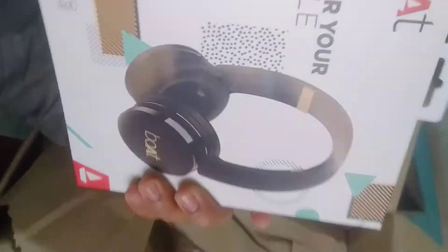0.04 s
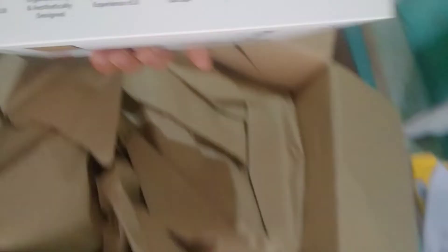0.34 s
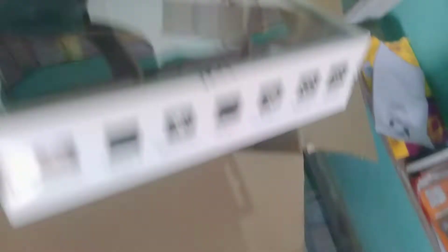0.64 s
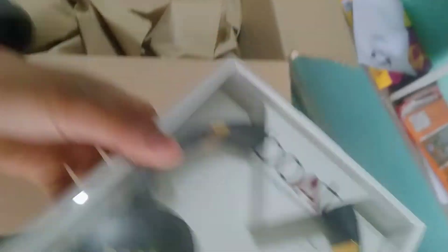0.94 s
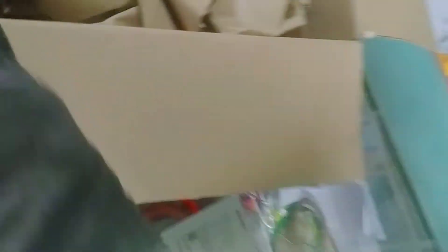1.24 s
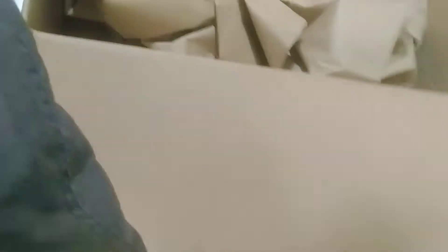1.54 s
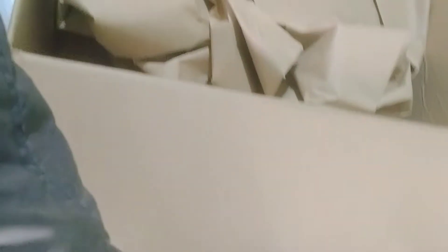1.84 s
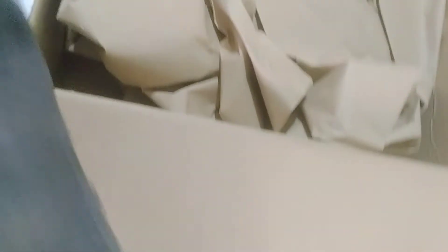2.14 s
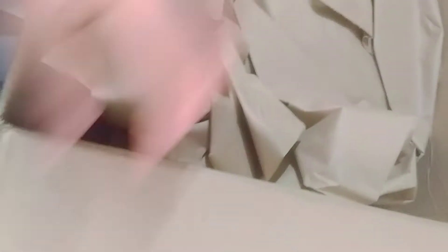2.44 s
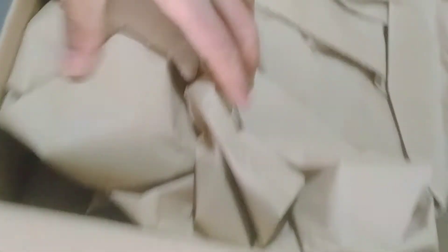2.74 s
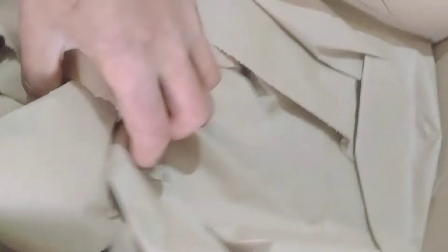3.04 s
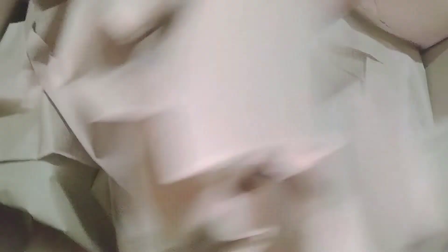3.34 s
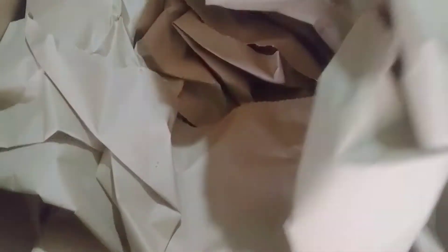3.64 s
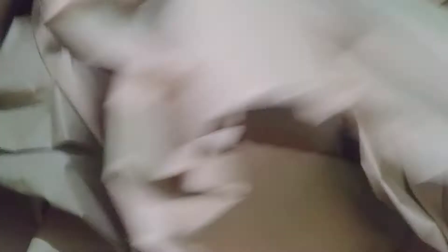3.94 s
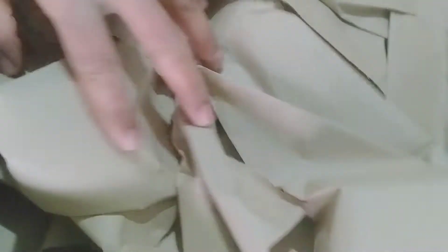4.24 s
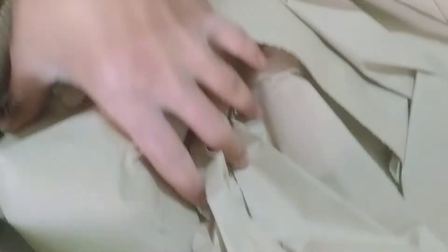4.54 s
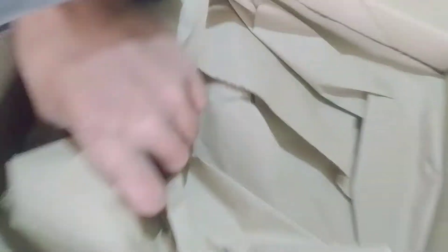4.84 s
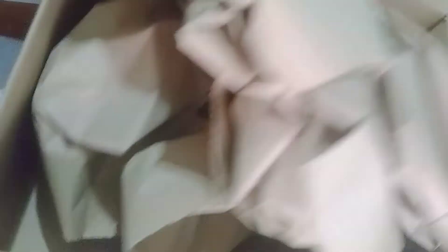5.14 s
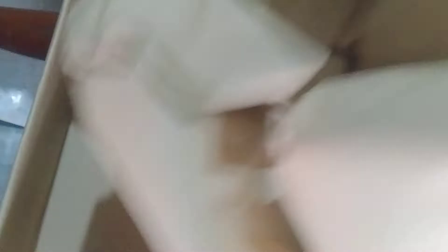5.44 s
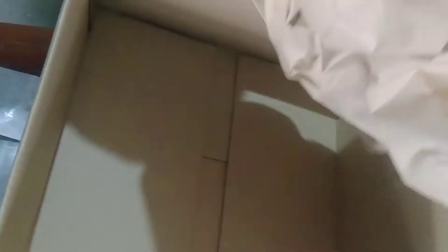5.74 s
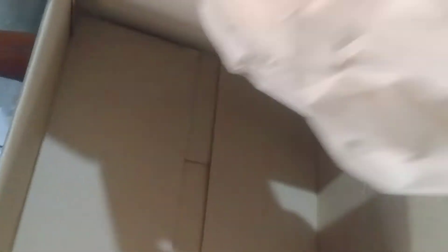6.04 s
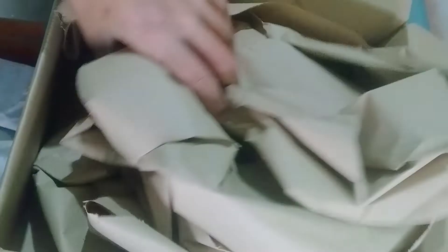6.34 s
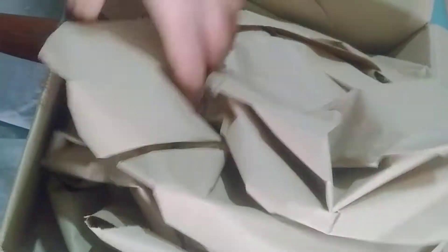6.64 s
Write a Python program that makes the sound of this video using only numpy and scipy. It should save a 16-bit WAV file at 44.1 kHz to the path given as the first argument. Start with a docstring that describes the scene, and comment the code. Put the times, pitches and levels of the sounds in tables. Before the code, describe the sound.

A small carton is set aside with faint taps, a short skid and the brush of a sleeve. Then a hand digs through crumpled packing paper in a cardboard box, much louder, with sliding hiss, crackles, sharp crease snaps and hollow bumps. The paper squeaks briefly as the wad is lifted and the box thuds. After a short lull the paper is stuffed back with another thump. A close microphone in a small, quiet room.

```python
"""A small, quiet room, heard through one close microphone. A small carton is lifted out and set aside
with taps, a skid and the brush of a sleeve. Then a hand digs through crumpled packing paper in a
cardboard box, lifts the wad out and stuffs it back. Sheets hiss as they slide and crackle as they
buckle, creases snap, and a fold squeaks as it sticks and slips. Bumps make the box walls ring,
and the box thuds as it rocks on the floor."""
import sys
import numpy as np
from scipy import signal
from scipy.fft import rfft, irfft
from scipy.io import wavfile
from scipy.ndimage import uniform_filter1d, map_coordinates

SR = 44100
rng = np.random.default_rng(int(sys.argv[2]) if len(sys.argv) > 2 else 0)


def inscribe(sig):
    """Save sig as 16-bit PCM at rate SR to the path in sys.argv[1].

    A 1-D sig is mono; a 2-D sig holds one channel per row.
    Samples are clipped to [-1, 1] before scaling.
    """
    pcm = np.round(np.clip(np.atleast_2d(sig).T, -1, 1) * 32767)
    wavfile.write(sys.argv[1], SR, pcm.astype(np.int16))


N = 294588
TIME = np.arange(N) / SR

# How hard the hand works the paper: time_s, sliding_db, crumpling_db
DIG_IN = [(2.527, -52.5, -49), (2.575, -52.5, -53.5), (2.61, -41.5, -42.5), (2.63, -52, -44.5),
          (2.665, -43.5, -47), (2.69, -41, -43.5), (2.725, -46, -46), (2.755, -48.5, -49),
          (2.795, -40.5, -39.5), (2.83, -39.5, -49), (2.853, -45, -49), (2.875, -39.5, -47),
          (2.915, -42, -46.5), (2.96, -40, -39), (3.0, -42, -39.5), (3.04, -39, -37), (3.18, -34.5, -34),
          (3.24, -37.5, -39.5), (3.31, -35.5, -37), (3.37, -40.5, -39.5), (3.54, -41, -40.5),
          (3.615, -45.5, -43.5), (3.66, -44.5, -42), (3.70, -50.5, -46.5), (3.75, -50.5, -52),
          (3.775, -61, -61), (3.812, -52, -53)]
PULL_OUT = [(3.814, -46.5, -38.5), (3.849, -41.5, -45), (3.901, -39, -38), (3.93, -41.5, -42),
            (3.959, -35.5, -36), (4.06, -33.5, -36), (4.128, -33, -35.5), (4.175, -38.5, -39.5),
            (4.235, -35, -33.5), (4.268, -33.5, -33.5), (4.291, -41, -43.5), (4.33, -43.5, -45.5),
            (4.4, -37, -38), (4.46, -36, -38), (4.53, -43.5, -44.5), (4.6, -38, -40), (4.74, -43, -42),
            (4.829, -37, -35), (4.901, -38, -41), (5.02, -38, -44.5), (5.11, -32, -38.5),
            (5.18, -38.5, -42), (5.235, -41.5, -41), (5.28, -39, -48), (5.39, -41.5, -41.5),
            (5.47, -51.5, -46), (5.58, -55.5, -57.5), (5.9, -53.5, -60.5), (6.02, -67.5, -61)]
STUFF_BACK = [(6.021, -66.5, -63.5), (6.11, -48, -51.5), (6.16, -45.5, -50), (6.22, -34, -31),
              (6.312, -31, -36.5), (6.46, -43.5, -39.5), (6.509, -53.5, -47.5), (6.68, -48.5, -46.5)]
# Brief swells in the paper's sound: middle_s, length_s, level_db
FOLD_COLLAPSES = [(2.603, 0.022, -42.5), (2.826, 0.0086, -40), (2.915, 0.016, -42), (3.635, 0.029, -43),
                  (3.743, 0.022, -46), (3.941, 0.01, -35), (4.494, 0.013, -35.5), (5.232, 0.013, -44),
                  (6.2, 0.013, -38.5), (6.32, 0.048, -35.5)]   # a fold caves in with a cluster of crackles
SHEET_BILLOWS = [(2.62, 0.072, -48), (2.73, 0.033, -47), (2.955, 0.05, -46), (3.04, 0.02, -46),
                 (3.17, 0.019, -47), (3.31, 0.041, -47), (3.725, 0.039, -46), (4.39, 0.013, -32.5),
                 (4.51, 0.038, -38.5), (4.64, 0.17, -41.5), (4.83, 0.077, -40), (5.0, 0.13, -44),
                 (5.41, 0.1, -43), (5.47, 0.081, -42), (6.31, 0.15, -36), (6.62, 0.088, -44.5)]   # a push makes a whole sheet billow
AIR_SHOVES = [(1.9, 0.073, -69), (2.2, 0.42, -71), (4.06, 0.096, -58), (5.21, 0.04, -48.5),
              (5.47, 0.068, -40), (6.26, 0.13, -45.5), (6.36, 0.088, -54)]   # the box or the wad pushes air about
# The tone (how strong the lows and highs are) of each paper sound: frequency_hz, level_db
SLIDE_TONE = [(1800, -23), (2800, -4.5), (3400, -4), (4400, 0), (5100, 1), (5800, 0), (6500, -8),
              (7000, -22), (7500, -29.5)]
CRUMPLE_TONE = [(400, -23.5), (570, -11.5), (700, 3.5), (820, 6.5), (910, 0), (1090, 5), (1250, 2.5),
                (1470, 1.5), (1700, 3), (2350, 1.5), (2900, -8), (3500, -12.5), (4500, -28.5)]
CRUNCH_TONE = [(380, -18), (520, -5.5), (620, 0), (740, -2), (950, -10.5), (1400, -25.5)]   # broad patches of paper buckling
FLAP_TONE = [(90, -33.5), (180, -5.5), (255, 1), (305, 2.5), (345, 0), (390, -0.5), (490, -1), (570, -10),
             (800, -26.5)]
AIR_TONE = [(30, -40.5), (60, -20), (85, -12), (125, 6.5), (170, 1), (230, -10), (320, -27.5)]
POP_TONE = [(100, -15), (300, -2.5), (1000, -2), (2900, -6.5), (5000, -14)]   # the flat patch beside a snapping crease
CRACK_TONE = [(800, -12), (2000, -6.5), (3200, -1), (4600, 7.5), (5600, 2.5), (6300, 1), (7000, -14.5),
              (8000, -32)]   # the crease itself
RASP_TONE = [(2500, -1), (3800, -12), (5100, 1), (5900, -0.5), (6500, -12), (7200, -29.5)]   # the rough part of the squeak
# Big creases snapping: start_s, pop_db, crack_db, pitch_hz, length_s
BIG_SNAPS = [(2.537, -46, -43.5, 2200, 0.0045), (2.6877, -34, -39.5, 1980, 0.0062),
             (2.7262, -41, -42, 1700, 0.0021), (2.9275, -39, -40, 1690, 0.0017),
             (2.9383, -36, -35, 2000, 0.0015), (2.957, -28.5, -27.5, 900, 0.003),
             (3.0255, -32, -29, 1700, 0.0069), (3.0315, -35, -30, 2000, 0.0023),
             (3.0645, -36, -27.5, 2410, 0.0046), (3.1326, -21, -34, 1810, 0.0033),
             (3.134, -33.5, -22.5, 2450, 0.0033), (3.1432, -37, -18.5, 2930, 0.0028),
             (3.1434, -15.5, -25.5, 1900, 0.0012), (3.1415, -22, -33, 900, 0.0055),
             (3.171, -30.5, -25, 2530, 0.0041), (3.1807, -27, -34, 1510, 0.0062),
             (3.271, -35.5, -34, 2800, 0.0031), (3.3025, -33.5, -19, 2540, 0.0054),
             (3.334, -29, -29, 2600, 0.01), (3.3975, -29, -41, 1670, .006),
             (3.5495, -32, -36, 1670, 0.0046), (3.6475, -40, -37, 1930, 0.0036),
             (3.8173, -36.5, -35, 2060, 0.0055), (3.864, -30, -37, 1670, 0.006),
             (3.8935, -29, -38, 2000, .004), (3.9515, -30, -29, 2280, 0.0038),
             (3.966, -31, -33, 1900, 0.0024), (4.052, -32, -31, 1630, .003),
             (4.132, -31, -40, 1900, 0.0014), (4.381, -25.5, -24.5, 1900, 0.0051),
             (4.4385, -31, -38, 1980, 0.0031), (4.461, -38, -31, 2200, 0.0023),
             (4.5502, -41.5, -24.5, 2660, 0.0023), (4.709, -45, -40, 1510, 0.0027),
             (4.7255, -32.5, -35.5, 2600, 0.0023), (4.7692, -27, -29, 2500, 0.0076),
             (4.8255, -30, -31, 2000, 0.0059), (4.84, -28.5, -31, 2180, 0.0029),
             (4.9624, -30.5, -33, 2360, 0.0044), (5.0045, -38, -36, 2000, 0.0033),
             (5.368, -32, -29.5, 2200, 0.006), (5.4461, -30.5, -38, 1090, 0.0075),
             (5.4795, -36, -52, 1310, 0.0027), (6.2318, -21.5, -27.5, 2000, .007),
             (6.3085, -35, -27.5, 1490, 0.0016), (6.4215, -34, -38.5, 1900, 0.003),
             (6.454, -36, -33.5, 2200, 0.0016), (6.5125, -43.5, -44.5, 2000, 0.0043)]
# Kinks running along a fold: start_s, length_s, level_db, start_hz, end_hz
KINK_ZIPS = [(2.537, .004, -43, 700, 4400), (2.7258, .0042, -33, 1450, 4500),
             (2.9275, .0035, -32, 1100, 2800), (3.1708, .003, -24, 6400, 2000),
             (3.6458, .0056, -30, 950, 4600), (3.8168, .0062, -30.5, 6300, 1300),
             (4.4388, .0045, -31, 5600, 3500)]
# A fold squeaking under a finger: time_s, level_db, pitch_hz
FOLD_SQUEAK = [(5.046, -47, 2450), (5.0505, -21.5, 2480), (5.053, -34.5, 2312), (5.0585, -19.5, 2443),
               (5.062, -33, 2470), (5.069, -16, 2370), (5.073, -25.5, 2240), (5.082, -31, 2240)]
# A stiff paper edge slipping over the box rim: start_s, level_db
EDGE_SLIPS = [(5.3661, -31), (5.3682, -22.5), (5.3705, -26.5), (5.374, -33)]
# Cardboard and paper sliding: start_s, end_s, level_db, start_hz, end_hz, width_share (of start_hz)
HOLLOW_SWISHES = [(0.477, 0.633, -70.5, 5580, 4950, .06), (1.415, 1.716, -77, 754, 677, 0.044),
                  (1.853, 2.426, -70, 882, 1194, 0.035), (1.878, 1.933, -75, 4750, 4650, .05),
                  (2.761, 2.927, -52, 4720, 4440, .05), (3.195, 3.299, -37.5, 5180, 4960, .05),
                  (4.871, 5.076, -43, 5430, 6050, 0.045), (6.168, 6.488, -41, 5550, 5700, 0.064),
                  (5.718, 5.96, -66.5, 993, 865, 0.069), (5.954, 6.199, -70.5, 695, 712, .1),
                  (6.183, 6.472, -41, 941, 1101, 0.14), (6.477, 6.745, -47, 1100, 850, 0.27),
                  (6.481, 6.656, -53.5, 2590, 2814, 0.041)]
# Knocks, each favouring one pitch: start_s, level_db, contact_hz
BOX_BUMPS = [(2.688, -19.5, 380), (2.957, -28, 420), (3.043, -18.5, 380), (3.143, -17.5, 487),
             (3.287, -32, 330), (4.079, -24.5, 300), (4.385, -20.5, 330), (4.392, -20.5, 300),
             (4.585, -15, 317), (4.836, -30.5, 336), (5.371, -26, 700), (5.445, -17.5, 405),
             (5.454, -11, 268), (6.233, -13, 440), (6.279, -13, 332)]   # wad and knuckles hit the box
CARTON_TAPS = [(.6585, -50, 1020), (.682, -71, 800), (.836, -48, 250), (.848, -47.5, 1410),
               (.850, -36.5, 252), (.862, -47.5, 710), (.873, -52, 696), (.883, -47, 500), (.894, -57, 950),
               (.905, -53, 1050), (1.886, -40, 300), (1.895, -67, 600), (1.908, -50, 330),
               (2.145, -49, 450)]   # the carton is tapped and set down
# The whole box rocking on the floor: start_s, level_db
BOX_THUDS = [(5.4562, -16.5), (5.489, -29), (5.519, -29.5), (6.236, -21)]
# The carton juddering over a surface: time_s, level_db, slips_per_s
CARTON_SKID = [(1.07, -80, 235), (1.085, -57, 195), (1.113, -53.5, 190), (1.138, -59, 175),
               (1.16, -66, 120), (1.19, -80, 154)]
# The notes each thing rings with: pitch_hz, level_db, fade_s (time to fall by 60 dB)
EDGE_NOTES = [(1170, 0, .008), (1310, -4.5, 0.027), (1805, -18, 0.071), (2360, -2, .008), (4330, 3, .012),
              (5300, -10, .01)]
BOX_WALL_NOTES = [(224, -31.5, 0.032), (272.7, -9, 0.049), (348, 0.5, 0.015), (411, -1, 0.021),
                  (614, -3.5, 0.027), (850, -8.5, 0.044), (1110, -12, 0.04), (1310, -9.5, 0.094)]
BOX_BOTTOM_NOTES = [(134.7, -3, 0.115), (154, -2, 0.06), (207.5, -3.5, 0.073), (260, -7, 0.013)]
CARTON_NOTES = [(188, -17, 0.14), (300, -20.5, 0.099), (754, 0.5, 0.02), (916, 1.5, 0.021),
                (1020, 3, 0.021), (2000, 1.5, 0.015), (2570, 2, .012)]
SKID_NOTES = [(181, 0, 0.1), (382, -4, 0.17), (653, 4.5, 0.038), (829, -8, .05), (1120, -1, 0.015),
              (1555, 0.5, 0.047)]
# Sleeve and carton brushing past: middle_s, length_s, hiss_db, rub_db
SLEEVE_STROKES = [(0, 0.064, -69, -68), (0.17, 0.2, -70.5, -68), (0.297, 0.059, -67, -65),
                  (0.567, 0.097, -69.5, -79), (0.903, .12, -71.5, -68.5), (1.127, 0.077, -68.5, -66),
                  (1.31, 0.27, -70, -68.5), (1.76, 0.25, -75.5, -71.5), (1.9, 0.037, -74, -59.5),
                  (2.178, 0.27, -66, -63), (2.474, 0.066, -75, -67.5)]
# The tone of the sleeve's hiss, its dull rub and the quiet room: frequency_hz, level_db
HISS_TONE = [(900, -4), (1500, 1), (2200, 2.5), (2650, -2), (3100, 1), (5500, 1), (6200, -3), (7000, -19)]
RUB_TONE = [(50, -19), (100, 0), (190, -2.5), (235, -6), (285, 2.5), (440, -6.5), (700, -6), (1000, -5.5),
            (1400, -10.5), (2200, -22)]
HUSH_TONE = [(30, -26), (90, -8), (190, 2.5), (280, -7.5), (450, -8), (900, -8), (1800, -14), (5500, -17.5),
             (6300, -27), (7200, -25.5)]


def paper(sliding, crumpling, usual_crumpling_db=-39.5):
    """Sheets slide, crumple, flap and stir the air in the box, all in the same small jerks."""
    effort = crumpling / from_db(usual_crumpling_db)
    jerks_db = 1.13 * drift(70) + 0.5 * drift(18)
    buckles_per_s = 1100 * np.sqrt(effort)   # harder handling buckles more folds
    grains = crackle(buckles_per_s, spread_db=1.5, length_s=0.0023, low_hz=900, high_hz=6900)
    friction = rng.standard_normal(N)
    slide = from_db(-1) * sliding * toned(0.31 * grains + friction, SLIDE_TONE)
    crumple_gain = from_db(-3.5) * np.hypot(crumpling, swells(FOLD_COLLAPSES))
    crumple = crumple_gain * toned(grains + 1.62 * friction, CRUMPLE_TONE)
    crunch_gain = from_db(-56.5) * effort ** 1.3   # broad patches need a hard push to buckle
    crunch = crunch_gain * toned(grains + rng.standard_normal(N), CRUNCH_TONE)
    low_grains = crackle(per_s=700, spread_db=0.95, length_s=0.0032, low_hz=246, high_hz=526, count=4)
    flap_gain = np.hypot(from_db(-47) * effort ** 0.99, swells(SHEET_BILLOWS))
    flap = flap_gain * toned(low_grains + 0.59 * friction, FLAP_TONE)
    air_gain = np.hypot(from_db(-63.5) * effort ** 0.43, swells(AIR_SHOVES))
    air = air_gain * noise(AIR_TONE)
    rustle = sheet_echo(slide + crumple)
    return (rustle + crunch + flap + air) * from_db(jerks_db)


def handling(settle_s=0.018):
    """How strongly the paper slides and crumples; it rustles on briefly after the hand stops."""
    moves = (DIG_IN, PULL_OUT, STUFF_BACK)
    gains = sum(from_db(curves(move)) * during(move) for move in moves).clip(1e-9)
    fade = TIME / settle_s   # the gains may fall no faster than this
    return np.exp(np.maximum.accumulate(np.log(gains) + fade, axis=1) - fade)


def crackle(per_s, spread_db, length_s, low_hz, high_hz, count=10):
    """Tiny buckles of uneven size, shared out among paper patches of different pitches."""
    starts = rng.random(N) < per_s / SR
    sizes = starts * from_db(spread_db * np.minimum(rng.exponential(1, N), 3.5))
    patch = rng.integers(0, count, N)
    out = np.zeros(N)
    for k, hz in enumerate(np.geomspace(low_hz, high_hz, count)):
        power = signal.oaconvolve(sizes ** 2 * (patch == k), buckle(length_s) ** 2)[:N]
        out += crease(np.sqrt(np.abs(power)), hz, ring_share=0.36, sharpness=3.5)
    return rms_one(out)


def buckle(length_s, size=1024):
    """The quick rise and fall in strength as a buckle runs along a fold."""
    age = np.arange(size) / SR / length_s
    return age * np.exp(-4 * age)


def crease(strength, hz, ring_share, sharpness):
    """Fibres give way noisily and shake the stiff patch of paper next to the fold."""
    push = strength * rng.standard_normal(len(strength))
    return rms_one(push) + ring_share * rms_one(resonance(push, hz, sharpness))


def sheet_echo(rustle, typical_delay_s=0.0009, echo_db=-12):
    """An echo off the nearest sheet makes the rustle hollow; the tone shifts as the sheet moves."""
    delay_s = typical_delay_s * np.exp(0.35 * drift(5))
    delayed = map_coordinates(rustle, [(TIME - delay_s) * SR], order=3)
    gain = from_db(echo_db)
    return (rustle + gain * delayed) / np.hypot(1, gain)


def snaps(rows):
    """A crease gives way with a bright crack and pops the patch beside it; harder pops ring more."""
    out = np.zeros(N)
    for s, pop_db, crack_db, hz, length_s in rows:
        strength = buckle(length_s)
        pop = crease(strength, hz, ring_share=from_db(pop_db + 25.5), sharpness=7.8)
        crack = crease(strength, 2 * hz, ring_share=0.4, sharpness=5.8)   # the patch's higher note
        add(out, s, at_level(toned(pop, POP_TONE), pop_db + 0.5))
        add(out, s, at_level(toned(crack, CRACK_TONE), crack_db + 0.49))
    return out


def small_snap_rows(crumpling, per_s=22, typical_hz=1940, length_s=0.0025, count=128):
    """Rows for snaps(): small creases give way at random, louder when the crumpling is stronger."""
    times = DIG_IN[0][0] + np.cumsum(rng.exponential(1, count)) / per_s
    crumpling_db = 20 * np.log10(np.interp(times, TIME, crumpling))
    levels = crumpling_db + rng.normal(-1.5, 1.5, count)
    pitches = typical_hz * 2 ** rng.normal(0, 0.5, count)
    return [(s, db, db, hz, length_s) for s, db, hz in zip(times, levels, pitches) if s < TIME[-1]]


def zips(roughness=0.52, rough_hz=900):
    """A kink runs along a fold; its rough chirp glides as the free patch shrinks or grows."""
    out = np.zeros(N)
    for s, length_s, db, start_hz, end_hz in KINK_ZIPS:
        size = int(length_s * SR)
        phase = 2 * np.pi * np.cumsum(np.geomspace(start_hz, end_hz, size)) / SR
        grit = roughness * rms_one(lowpass(rng.standard_normal((2, 1024)), rough_hz))[:, :size]
        chirp = (1 + grit[0]) * np.sin(phase) + grit[1] * np.cos(phase)
        add(out, s, from_db(db) * rms_one(chirp * signal.windows.tukey(size, 0.5)))
    return out


def squeak():
    """Paper sticks and slips on paper in three quick bursts: a rough, sagging note with a bright rasp."""
    db, hz = curves(FOLD_SQUEAK)
    cycles = np.cumsum(hz * (1 + 0.045 * drift(600))) / SR
    note = rms_one(np.sin(2 * np.pi * cycles) * from_db(3.2 * drift(620)))
    return from_db(db) * during(FOLD_SQUEAK) * (0.6 * note + 0.68 * noise(RASP_TONE))


def flick(slip_s=0.0012, cutoff_hz=6000):
    """A stiff edge of the wad slips over the box rim; each gritty slip rings it with a dry tick."""
    out = np.zeros(N)
    for s, db in EDGE_SLIPS:
        slip = buckle(slip_s) * rng.standard_normal(1024)
        tick = signal.oaconvolve(slip, ringing(EDGE_NOTES))
        add(out, s, at_level(lowpass(tick, cutoff_hz), db))
    return out


def swishes(waver=0.025):
    """A surface drawn over fine ribs gives a hollow hiss whose pitch follows its uneven speed."""
    out = np.zeros(N)
    speed = np.exp(waver * drift(30))
    for start_s, end_s, db, start_hz, end_hz, width_share in HOLLOW_SWISHES:
        size = int((end_s - start_s) * SR)
        times = np.linspace(start_s, end_s, size)
        hz = np.linspace(start_hz, end_hz, size) * np.interp(times, TIME, speed)
        phase = 2 * np.pi * np.cumsum(hz) / SR
        flutter = lowpass(rng.standard_normal((2, size)), width_share * start_hz)
        hiss = rms_one(flutter[0] * np.cos(phase) + flutter[1] * np.sin(phase))
        add(out, start_s, from_db(db) * hiss * np.sin(np.linspace(0, np.pi, size)))
    return out


def knocks(rows, notes):
    """Knocks ring cardboard: soft ones build slowly and favour low notes, hard ones the high notes."""
    out = np.zeros(N)
    for s, db, contact_hz in rows:
        ring = ringing(notes)
        press = onset(len(ring), rise_s=0.72 / contact_hz)
        add(out, s, from_db(db + 2) * resonance(ring * press, contact_hz, sharpness=2.02))
    return out


def thuds():
    """The box sinks back on the floor and its bottom booms, with a soft start."""
    out = np.zeros(N)
    for s, db in BOX_THUDS:
        ring = ringing(BOX_BOTTOM_NOTES)
        press = onset(len(ring), rise_s=0.002)
        add(out, s, from_db(db + 1.5) * resonance(ring * press, hz=204, sharpness=1))
    return out


def ringing(notes, size=16384):
    """A struck panel rings with fading notes, a little different each time; deep bass barely escapes."""
    t = np.arange(size) / SR
    motion = np.zeros(size)
    for hz, db, fade_s in notes:
        motion += from_db(db + rng.normal(0, 0.7) - 60 * t / fade_s) * np.sin(2 * np.pi * hz * t)
    lowest_hz = notes[0][0]
    return highpass(motion, 0.75 * lowest_hz, order=2)


def skid():
    """The carton judders to rest in uneven slips, and each slip makes it ring."""
    db, slips_per_s = curves(CARTON_SKID)
    slip_count = np.floor(np.cumsum(slips_per_s * from_db(2.3 * drift(200))) / SR)
    slips = np.diff(slip_count, prepend=0) * from_db(2.1 * drift(300))
    friction = 0.011 * rng.standard_normal(N)
    judder = signal.oaconvolve(slips + friction, ringing(SKID_NOTES))[:N]
    return from_db(db) * during(CARTON_SKID) * rms_one(judder)


def sleeve():
    """Jacket cloth brushes along the cardboard; each stroke is a soft hiss and a dull rub."""
    hiss_gain = swells([(s, length_s, db) for s, length_s, db, _ in SLEEVE_STROKES])
    rub_gain = swells([(s, length_s, db) for s, length_s, _, db in SLEEVE_STROKES])
    hiss = hiss_gain * from_db(-1 + 1.6 * drift(53)) * noise(HISS_TONE)
    rub = rub_gain * from_db(-2 + 3.4 * drift(29.34)) * noise(RUB_TONE)
    return hiss + rub


def room(sound, fade_s=0.33, echo_db=-18, cutoff_hz=3600, size=22050):
    """Add the many quick, dull echoes from the box and the nearby walls."""
    t = np.arange(size) / SR
    tail = lowpass(rng.standard_normal(size), cutoff_hz) * from_db(-60 * t / fade_s) * (t > 0.003)
    return sound + from_db(echo_db) * signal.oaconvolve(sound, tail / np.linalg.norm(tail))[:N]


def from_db(db):
    """Turn decibels into a gain, a number to multiply a sound by."""
    return 10 ** (np.asarray(db) / 20)


def rms_one(x):
    """Scale a signal so its average strength (rms) is 1."""
    return x / np.sqrt(np.mean(x ** 2) + 1e-20)


def at_level(sound, db, over_s=0.0015):
    """Give a short sound the energy of a steady one at db that lasts over_s."""
    return from_db(db) * sound * np.sqrt(over_s * SR) / np.linalg.norm(sound)


def add(out, start_s, sound):
    """Mix a short sound into out."""
    at = round(start_s * SR)
    out[at:at + len(sound)] += sound[:N - at]


def curves(rows):
    """Join a table's points with straight lines: one curve for each column after the time."""
    times, *columns = np.transpose(rows)
    return [np.interp(TIME, times, column) for column in columns]


def during(rows):
    """1 from a table's first time to its last and 0 outside, with short ramps between."""
    return uniform_filter1d(1. * ((TIME >= rows[0][0]) & (TIME <= rows[-1][0])), size=128)


def onset(size, rise_s):
    """A gain that climbs from 0 towards 1."""
    return 1 - np.exp(-np.arange(size) / SR / rise_s)


def swells(rows):
    """A gain that rises and falls smoothly with each movement; overlaps add in power."""
    power = sum(from_db(db) ** 2 * np.exp(-np.pi * ((TIME - middle_s) / length_s) ** 2)
                for middle_s, length_s, db in rows)
    return np.sqrt(power + 1e-18)


def drift(points_per_s):
    """A random wobble with a typical size of 1."""
    points = rng.standard_normal(4096)
    return rms_one(np.interp(TIME * points_per_s, np.arange(len(points)), points))


def noise(tone):
    """Steady noise with the given tone, at strength 1."""
    return toned(rng.standard_normal(N), tone)


def toned(x, tone, size=4096):
    """Filter a sound to follow a tone table, then scale it to strength 1."""
    hz, db = np.transpose(tone)
    log_hz = np.log(hz)
    grid = np.log(np.maximum(np.arange(size // 2 + 1), 0.5) * SR / size)
    beyond_table = np.abs(grid - np.clip(grid, log_hz[0], log_hz[-1]))
    gains = from_db(np.interp(grid, log_hz, db) - 40 * beyond_table)
    # Build a minimum-phase filter: one that never rings ahead of a click.
    cepstrum = irfft(np.log(gains))
    cepstrum[1:size // 2] *= 2
    cepstrum[size // 2 + 1:] = 0
    click_response = irfft(np.exp(rfft(cepstrum)))
    return rms_one(signal.oaconvolve(x, click_response)[:N])


def resonance(x, hz, sharpness):
    """Favour one pitch; more sharpness means a narrower band and a longer ring."""
    return signal.lfilter(*signal.iirpeak(min(hz, SR / 4), sharpness, fs=SR), x)


def lowpass(x, hz):
    """Soften everything above hz."""
    return signal.sosfilt(signal.butter(2, hz, fs=SR, output="sos"), x)


def highpass(x, hz, order):
    """Soften everything below hz; a higher order cuts more steeply."""
    return signal.sosfilt(signal.butter(order, hz, "high", fs=SR, output="sos"), x)


def scene():
    """Paper, box, carton and the room's hush reach one microphone, the same in both channels."""
    sliding, crumpling = handling()
    box = knocks(BOX_BUMPS, BOX_WALL_NOTES) + thuds()
    carton = knocks(CARTON_TAPS, CARTON_NOTES) + skid()
    hush = from_db(-74) * noise(HUSH_TONE)
    rubbing = paper(sliding, crumpling) + squeak() + sleeve() + swishes()
    creases = snaps(BIG_SNAPS + small_snap_rows(crumpling)) + zips() + flick()
    mono = room(rubbing + creases + box + carton) + hush
    return np.array([mono, mono])


def record(dry):
    """The small microphone loses the deep bass, and the highest treble is cut steeply."""
    low_hz, high_hz = 79, 7600
    thin = highpass(dry, low_hz, order=6)
    return signal.sosfilt(signal.ellip(10, 0.2, 75, high_hz, fs=SR, output="sos"), thin)


dry = scene()
out = record(dry)
inscribe(out)
```